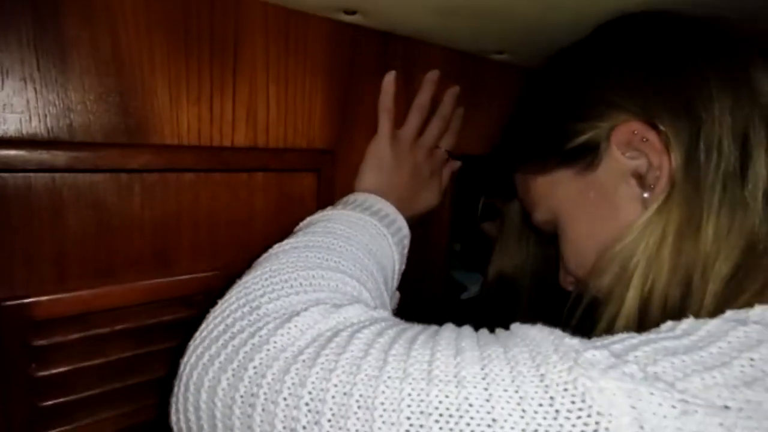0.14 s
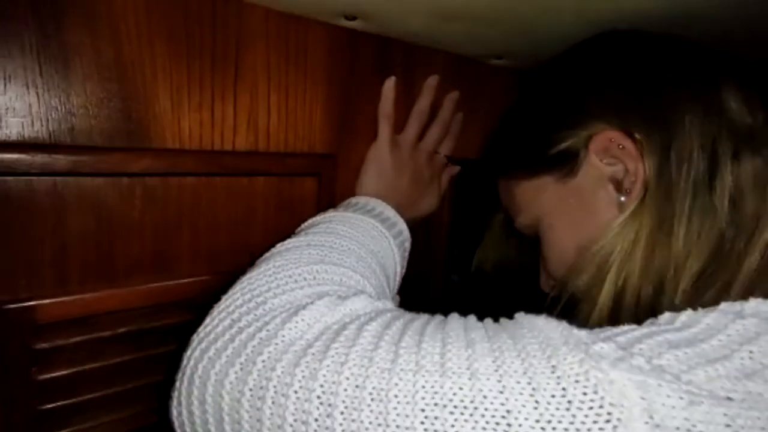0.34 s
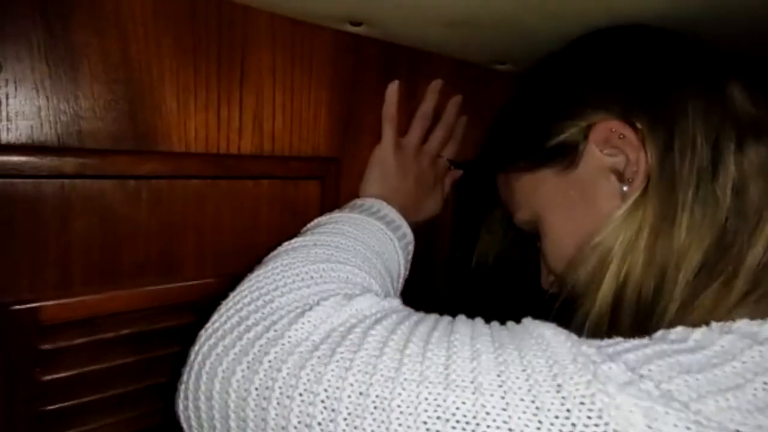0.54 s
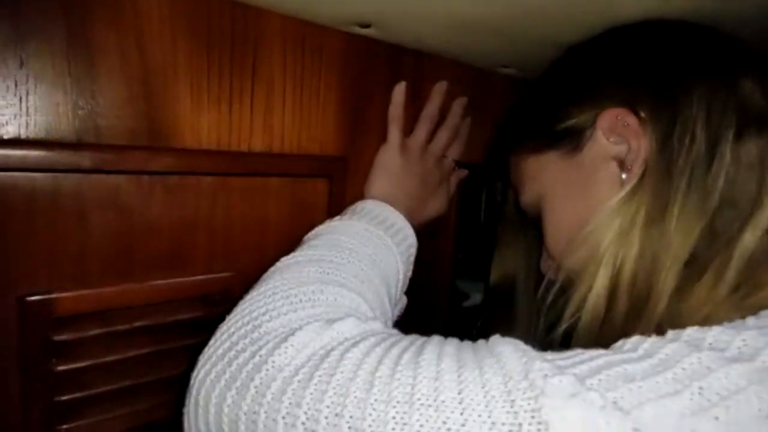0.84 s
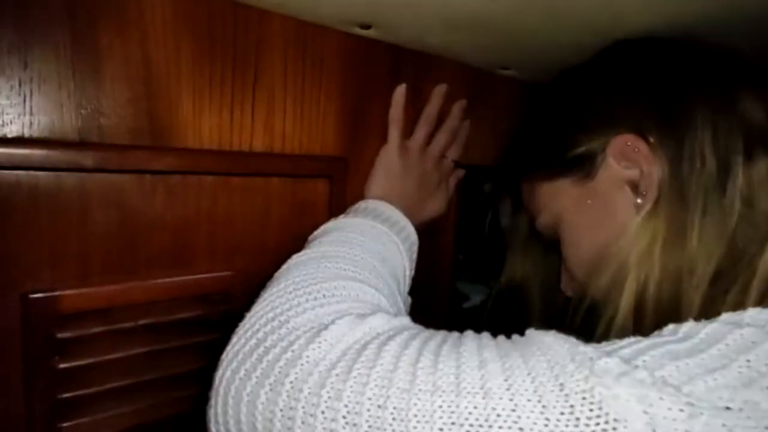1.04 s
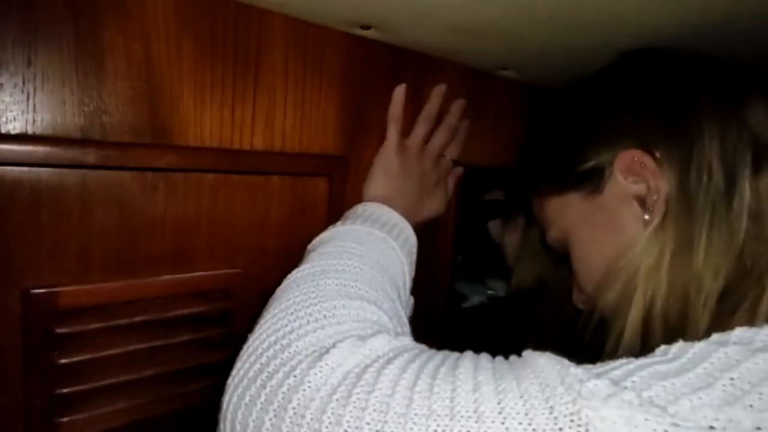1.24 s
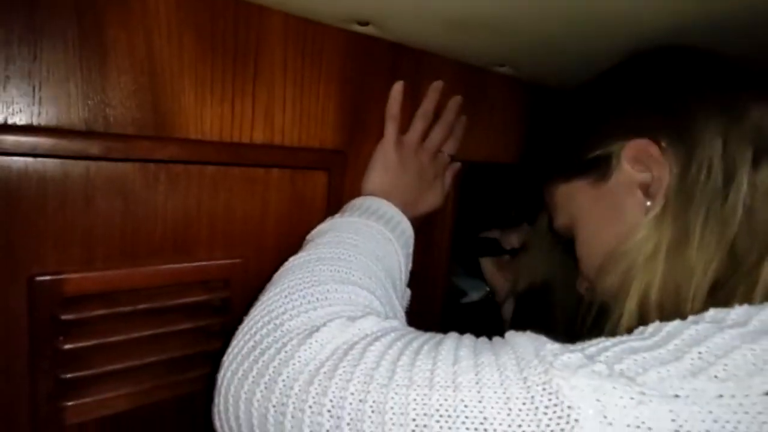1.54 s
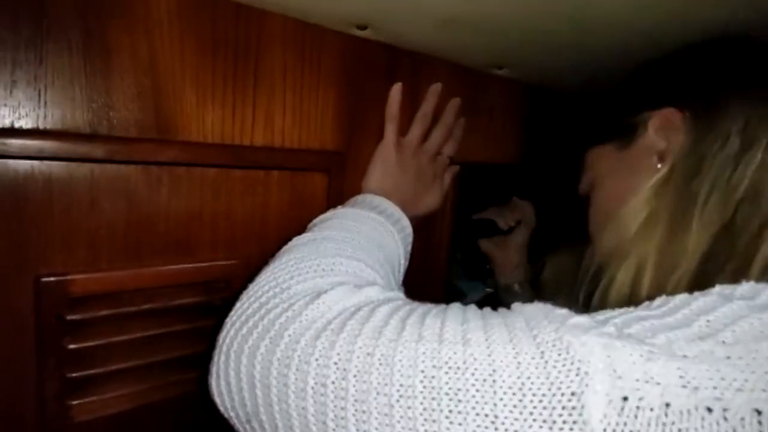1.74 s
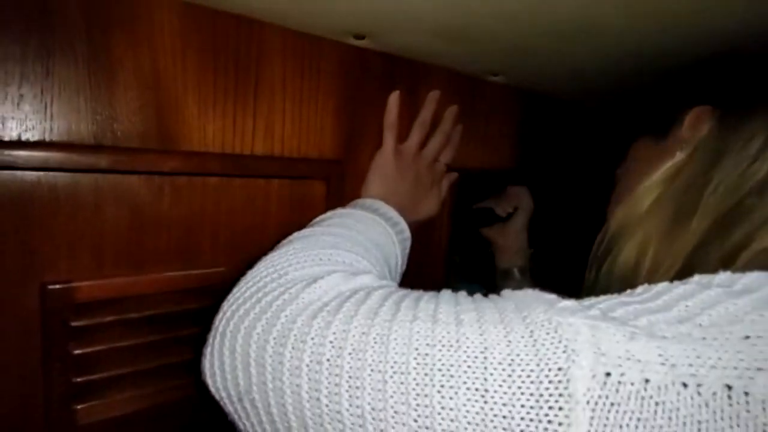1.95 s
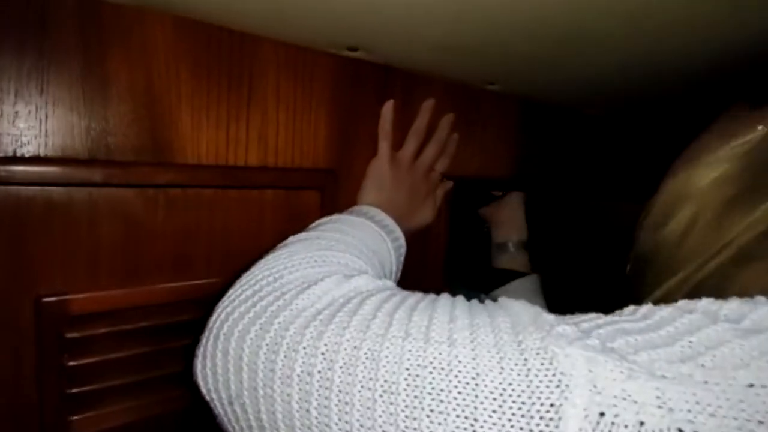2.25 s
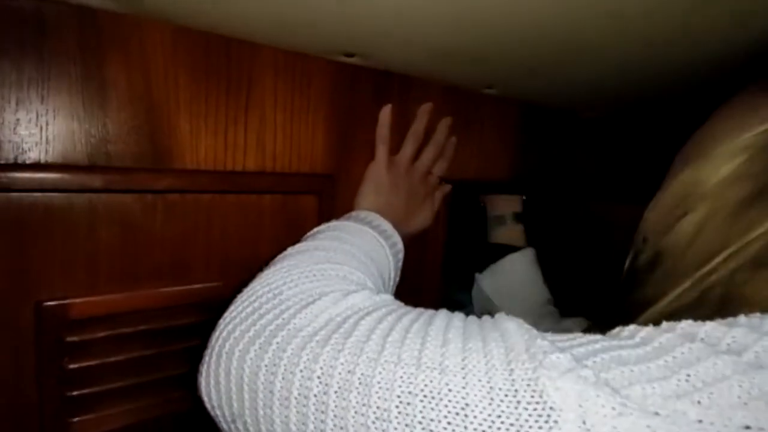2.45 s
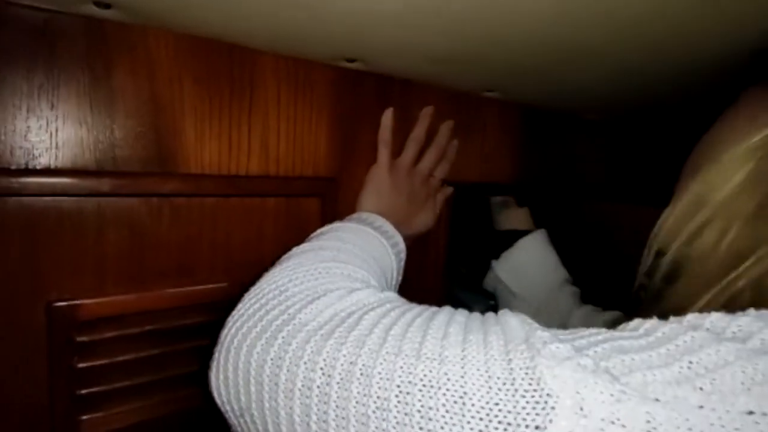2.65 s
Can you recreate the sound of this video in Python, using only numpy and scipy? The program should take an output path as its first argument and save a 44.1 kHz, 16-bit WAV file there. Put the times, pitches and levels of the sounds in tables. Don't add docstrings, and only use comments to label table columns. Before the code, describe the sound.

A hand toilet pump worked close by in a small wooden boat cabin. Rattling clack and low thumps at the start, a sharp clack at 0.4 s, a harder clack with splash at 0.85, lighter knocks from 1.0 to 1.45. Watery gurgle and hiss around 1.7, clacks at 2.15 and 2.3, then a loud hollow double glug at 2.5, the heaviest clack and boom at 2.6, and trailing bubbles.

```python
import sys
import numpy as np
from scipy import signal
from scipy.fft import rfft, irfft
from scipy.io import wavfile
from scipy.ndimage import uniform_filter1d

SR = 44100
rng = np.random.default_rng(int(sys.argv[2]) if len(sys.argv) > 2 else 0)


def to_wav(sig):
    pcm = np.clip(np.atleast_2d(sig), -1, 1) * 32767
    pcm = np.round(pcm).astype(np.int16)
    wavfile.write(sys.argv[1], SR, pcm.T)


def gain_from_db(level_db):
    decades = np.asarray(level_db, float) / 20
    return 10 ** decades


N = 123479

# (frequency [Hz], correlation [0-1])
PORT_LIKENESS = [(120, 0.98), (300, 0.59), (700, 0.69), (1500, 0.067)]


def evened(x):
    return x / np.sqrt(np.mean(x ** 2) + 1e-20)


def read(points, hz):
    f, value = np.transpose(points)
    return np.interp(np.log(hz + 1), np.log(f + 1), value)


def add(mix, start_s, sound):
    part = mix[:, round(start_s * SR):][:, :sound.shape[-1]]
    part += sound[..., :part.shape[1]]


def wavering(hz, depth, smooth, count):
    waver = depth * evened(uniform_filter1d(rng.standard_normal(count), size=smooth))
    return np.cumsum(hz * (1 + waver)) / SR


def port_pair(first, second, hz):
    same = np.clip(read(PORT_LIKENESS, hz), 0, 1).reshape(-1, *[1] * (first.ndim - 1))
    return np.array([first, same * first + np.sqrt(1 - same ** 2) * second])


def resonate(x, hz, width_hz):
    r = np.exp(-np.pi * width_hz / SR)
    return signal.lfilter([1 - r, 0, r - 1], [1, -2 * r * np.cos(2 * np.pi * hz / SR), r * r], x)


def burst(db, length_s, low_db, top_db, rise_s, t60_s, grit_db, ring_db, trim_db):
    # (frequency [Hz], density [dB per Hz])
    housing = [(180, -14.5), (300, -1), (1140, -9), (2170, -3.5), (4830, -13), (5250, -11.5), (6410, -19.5),
               (13800, -33.5), (16000, -37)]
    # (frequency [Hz], width [Hz], level [dB])
    bowl_modes = [(689, 75, -8), (942.6, 24, 4.5), (1168, 24, -8), (1318, 22, -0.5), (1750, 81, -4),
                  (2172, 54, -5.5), (2635, 77, -10.5), (3533, 86, -6)]
    size, grain = 8192, 64
    t, hz = np.arange(size) / SR, np.fft.rfftfreq(size, 1 / SR)
    grit = gain_from_db(grit_db * np.clip(rng.exponential(1, size // grain), 0, 2.5)).repeat(grain)
    first, second = rfft(rng.standard_normal((2, size)) * grit)
    tilt = [(600, low_db), (2000, 0.0029), (9000, top_db)]
    clicks = evened(irfft(port_pair(first, second, hz) * gain_from_db(read(housing, hz) + read(tilt, hz))))

    after_s = np.maximum(t - length_s, 0)
    held = np.minimum(t / rise_s, 1) * gain_from_db(-3 * np.minimum(t / length_s, 1))
    decay = gain_from_db(-60 * after_s / t60_s) + gain_from_db(-10 - 60 * after_s / 0.076)
    strike = clicks * held * decay

    ring = np.zeros_like(strike)
    for mode_hz, width_hz, mode_db in bowl_modes:
        gain = gain_from_db(mode_db + rng.uniform(-4.5, 3.7))
        ring += gain * resonate(strike, mode_hz * rng.uniform(0.96, 1.02), width_hz)
    return gain_from_db(db + trim_db) * (strike + gain_from_db(ring_db) * ring)


def lever_clacks(mix):
    # (time [s], peak [dB], rattle length [s], low tilt [dB], top tilt [dB])
    clack_events = [(0.055, -28, 0.031, -9, -5), (0.072, -20.5, .03, -2, 2.5), (0.429, -18, 0.012, -1, 5.5),
                    (0.595, -34.5, 0.0037, -4, -37), (0.838, -13, 0.012, 12, 11.5),
                    (0.874, -20.5, 0.022, 8, 9), (0.983, -25, 0.016, 0, 0), (1.008, -20.5, 0.012, 4.5, 1.5),
                    (1.142, -27.5, 0.01, 3, -2), (1.208, -18.5, 0.0087, -1.5, 3.5),
                    (1.248, -26.5, 0.0081, 6, -5), (1.437, -19, 0.01, -3.5, 7),
                    (2.143, -20.5, 0.0089, 1.5, 0), (2.331, -21, 0.017, -6, 12),
                    (2.586, -9.5, 0.015, 11.5, 9), (2.685, -23.5, 0.034, 3.5, 6)]
    for start_s, *row in clack_events:
        add(mix, start_s, burst(*row, rise_s=0.0015, t60_s=0.088, grit_db=2.5, ring_db=2.5, trim_db=-8.5))


def splashes(mix):
    # (time [s], peak [dB], length [s], low tilt [dB], top tilt [dB])
    splash_events = [(.001, -20, 0.0067, -4, 1.5), (0.686, -32.5, 0.038, 10, -13),
                     (0.823, -24, 0.033, 5, 11), (1.726, -22.5, 0.03, -9, -19.5),
                     (1.76, -20.5, 0.012, 8, -15), (1.998, -34.5, 0.027, -11, -5),
                     (2.321, -23.5, 0.013, -4, 0), (2.448, -26.5, 0.017, 9.5, 10),
                     (2.474, -21, 0.066, 10, 2.5), (2.52, -29, 0.03, 12.5, 2),
                     (2.619, -20.5, 0.033, -0.5, 8.5), (2.736, -20, 0.017, 10.5, -17)]
    for start_s, *row in splash_events:
        add(mix, start_s, burst(*row, rise_s=0.0028, t60_s=0.045, grit_db=1.0, ring_db=13, trim_db=-12.0))


def glug(db, hz, swell_s, fade_s):
    t = np.arange(SR // 7) / SR
    sag_octaves = 0.24 * (hz < 210) * (np.minimum(t / 0.05, 1) - 0.3)
    turns = wavering(hz * 2 ** -sag_octaves, 0.055, 150, len(t))
    tone = np.sin(2 * np.pi * turns)
    tone += 0.057 * np.sin(4 * np.pi * turns + 1) + 0.031 * np.sin(6 * np.pi * turns)
    swell = np.sin(np.pi / 2 * np.minimum(t / swell_s, 1)) ** 2
    fade_s = min(abs(fade_s), 0.045)
    fade_db = -20 * (np.maximum(t - swell_s, 0) / fade_s) ** 1.5
    return tone * swell * gain_from_db(db + fade_db)


def glugs(mix):
    # (time [s], peak [dB], pitch [Hz], swell [s], fade to -20 dB [s]: sign ignored, 0.045 at most)
    glug_events = [(.035, -21.5, 386.6, 0.01, 0.4), (0.435, -28.5, 228, 0.003, 5),
                   (0.507, -32.5, 247.5, 0.0094, -1.5), (0.561, -28.5, 238, 0.0087, 0.1),
                   (0.634, -37, 459, 0.01, .02), (0.85, -24.5, 623, 0.0084, .02),
                   (0.852, -27.5, 343, 0.008, 0.5), (1.379, -30.5, 176, 0.0078, .03),
                   (1.44, -28, 163, 0.0078, .02), (1.551, -25.5, 195, 0.003, .045),
                   (1.635, -35, 680, 0.008, -11), (1.701, -20.5, 384, 0.0073, 0.26),
                   (1.76, -30.5, 532, 0.025, 4.2), (2.318, -19, 346.6, 0.0052, -3),
                   (2.322, -23.5, 956, 0.018, 0.4), (.868, -24.5, 265, 0.013, -7),
                   (2.384, -23, 436, 0.0066, .045), (2.47, -7, 350.4, 0.032, 0.23),
                   (2.524, -7.5, 280, 0.0086, -0.15), (2.538, -14.5, 274, 0.0024, 2),
                   (2.573, -18, 269.5, 0.0076, 4.5), (2.632, -22.5, 471, 0.0038, .03),
                   (2.722, -23, 197.6, 0.0093, 1)]
    for start_s, *row in glug_events:
        add(mix, start_s, glug(*row))


def boom(db, jolt_db, hz, swell_s):
    t = np.arange(0, 0.35, 1 / SR)
    after_s = np.maximum(t - swell_s, 0)
    shape = np.minimum(t / swell_s, 1) * gain_from_db(-60 * 1.73 * after_s ** 1.272 / 0.35 ** 1.24)
    panel = shape * np.sin(2 * np.pi * hz * t + rng.uniform(0, 2 * np.pi))
    jolt = gain_from_db(jolt_db) * np.sin(2 * np.pi * rng.uniform(58, 80) * t) * gain_from_db(-60 * t / 0.053)
    return gain_from_db(db) * (panel + jolt)


def cabin_booms(mix):
    # (time [s], peak [dB], slow jolt over boom [dB])
    boom_events = [(0.001, -27, -2), (0.04, -26.5, 6), (0.116, -28, 3), (0.187, -26, -5),
                   (0.27, -25.5, -10), (0.443, -24, -21), (0.576, -23.5, -4), (0.658, -28, -10),
                   (0.751, -27, -20), (0.842, -30, -10), (0.961, -32, 7), (1.002, -23, 3),
                   (1.213, -25.5, -9), (1.404, -27.5, 3), (1.459, -29, 9), (1.563, -25, 2), (1.683, -29, 7),
                   (1.749, -27, 6), (2.153, -26.5, -13), (2.313, -33, 6), (2.464, -24.5, -5),
                   (2.573, -13.5, -2), (2.72, -23, 4)]
    for start_s, *row in boom_events:
        add(mix, start_s, boom(*row, hz=109.9 * rng.uniform(0.916, 1.03), swell_s=0.0093))


def chirp(db, hz, length_s):
    t = np.arange(SR // 16) / SR
    turns = wavering(hz, 0.013, 120, len(t))
    arch = np.sin(np.pi * np.minimum(t / (1.2 * length_s), 1) ** 0.82) ** 2
    return gain_from_db(db) * arch * np.sin(2 * np.pi * turns)


def bubble_chirps(mix):
    # (time [s], peak [dB], pitch [Hz], length [s])
    chirp_events = [(0.254, -35, 268, 0.045), (0.43, -27.5, 4060, 0.0056), (0.436, -23.5, 5160, 0.0049),
                    (.44, -26.5, 3610, 0.0056), (0.441, -28, 2390, 0.0065), (0.595, -36, 1220, 0.0065),
                    (0.634, -32.5, 216.4, 0.028), (0.833, -21, 1640, 0.013), (.838, -27.5, 2300, 0.023),
                    (.836, -23, 537, .024), (0.871, -28.5, 628, 0.045), (.882, -33, 464, 0.029),
                    (0.883, -28, 1440, 0.015), (0.901, -28, 342, 0.025), (1.234, -36.5, 245, 0.038),
                    (1.726, -38, 913, 0.033), (1.735, -29.5, 648, 0.025), (1.731, -33.5, 2232, 0.019),
                    (1.762, -32, 900, 0.017), (1.765, -26.5, 2210, 0.021), (2.317, -23, 1275, 0.014),
                    (2.322, -27, 1120, .035), (2.336, -28.5, 1820, 0.025), (2.338, -29, 2066, 0.018),
                    (2.345, -26, 2390, 0.021), (2.35, -28.5, 1297, 0.025), (2.478, -30.5, 531, 0.055),
                    (2.483, -29, 967, 0.016), (2.491, -30, 677, 0.07), (2.493, -22, 1264, 0.027),
                    (2.506, -25, 856, 0.026), (2.517, -25.5, 1105, .025), (2.526, -32, 1825, 0.035),
                    (2.522, -31.5, 2470, 0.024), (2.586, -23.5, 545, 0.0166), (2.587, -22.5, 1668, 0.019),
                    (2.641, -22.5, 258, 0.033), (2.657, -30, 428, 0.049), (2.682, -31, 2490, 0.046),
                    (2.731, -28.5, 961, 0.022), (2.739, -33.5, 588, 0.041), (2.743, -29.5, 1856, 0.018),
                    (1.72, -28.5, 411, 0.036), (2.505, -33.5, 3260, 0.031)]
    for start_s, *row in chirp_events:
        add(mix, start_s, chirp(*row))


def patchy(colour, level_db, bright_db, patchy_db, flicker_db):
    size, hop = 1024, 256
    frames, hz = N // hop + 5, np.fft.rfftfreq(size, 1 / SR)
    a, b, c, d, patches = rng.standard_normal((frames, len(hz), 5)).T
    noise = port_pair(a + 1j * b, c + 1j * d, hz)
    patches = evened(uniform_filter1d(uniform_filter1d(patches, 6, 0), 8, 1))
    field_db = read(colour, hz)[:, None] + patchy_db * patches + flicker_db * rng.standard_normal(frames)
    bright_share = read([(4000, 0.11), (8500, 0.65), (12500, 0.6), (15500, 0.6)], hz)
    field_db = field_db + np.outer(bright_share, bright_db(np.arange(frames) * hop / SR))
    x = signal.istft(noise * gain_from_db(field_db), nperseg=size, noverlap=size - hop)[1][:, :N]
    return evened(x) * gain_from_db(level_db(np.arange(N) / SR))


def valve_hiss():
    # (time [s], hiss [dB], brightness [dB])
    flow = [(0, -41, -1), (.2, -51, -3.5), (.55, -51.5, -0.5), (.8, -47.5, 8), (0.959, -49, 6),
            (1.1, -52.5, -2), (1.38, -51, -3), (1.62, -45, 3), (1.85, -43, 8), (2.029, -49, 6.5),
            (2.28, -50, -6), (2.44, -47.5, -8), (2.55, -38, 4), (2.8, -47.5, 7)]
    # (frequency [Hz], density [dB per Hz])
    hiss_colour = [(290, -4.5), (631, -1), (870, -8), (2360, -2.5), (2980, -12.5), (6000, -19.5),
                   (7500, -31.5), (15500, -31)]
    s, db, bright = np.transpose(flow)
    return patchy(hiss_colour, lambda t: np.interp(t, s, db) + 4.0,
                  lambda t: np.interp(t, s, bright) + 5, patchy_db=0.0, flicker_db=2.5)


def hose_gurgle():
    # (time [s], level [dB])
    slosh = [(0, -33), (.3, -38.5), (.7, -40), (1.05, -39.5), (1.13, -50.5), (1.36, -44), (1.42, -39),
             (1.75, -35), (1.9, -41.5), (2.2, -42), (2.29, -53), (2.45, -33.5), (2.48, -26), (2.66, -30),
             (2.8, -33.5)]
    # (frequency [Hz], density [dB per Hz])
    gurgle_colour = [(8.8, -35), (15, -14), (103, 5.5), (172, -7.5), (267, -2), (321, -6), (1200, -22),
                     (1560, -60)]
    s, db = np.transpose(slosh)
    return patchy(gurgle_colour, lambda t: np.interp(t, s, db), np.zeros_like, patchy_db=2.1, flicker_db=1.1)


def cabin(x):
    # (frequency [Hz], t60 [s])
    cabin_t60 = [(300, 0.41), (8000, 0.011)]
    # (frequency [Hz], echo over direct [dB])
    echo_level = [(100, -27.5), (400, -7)]
    taps = np.zeros((2, SR // 2))
    at = np.arange(80, SR // 2 - 20, 20) + rng.integers(0, 20, (2, (SR // 2 - 81) // 20))
    np.put_along_axis(taps, at, rng.choice([-1., 1.], at.shape), 1)
    hz, t, z = signal.stft(taps, SR, nperseg=256)
    t60_s = read(cabin_t60, hz)[:, None]
    gain = gain_from_db(-60 * t / t60_s + read(echo_level, hz)[:, None]) / np.sqrt(150 * t60_s)
    tail = signal.istft(z * gain, SR, nperseg=256)[1]
    return signal.fftconvolve(x, tail, axes=1)[:, :N]


def ports(x):
    # (frequency [Hz], left minus right [dB])
    left_lean = [(60, 1), (180, -1.5), (550, -0.5), (1650, 8), (4970, 2.5), (15000, -4.5)]
    lag_s, lag_from_hz = 23 / 44100, 1300
    hz = np.fft.rfftfreq(N, 1 / SR)
    lag = np.exp(-2j * np.pi * hz * lag_s / (1 + (lag_from_hz / (hz + 1)) ** 6))
    lean = gain_from_db(read(left_lean, hz) / 2)
    return irfft(rfft(x) * np.array([lag * lean, 1 / lean]), N)


def scene():
    mix = valve_hiss() + hose_gurgle()
    lever_clacks(mix)
    splashes(mix)
    glugs(mix)
    cabin_booms(mix)
    bubble_chirps(mix)
    return ports(mix + cabin(mix))


def roll_off(x):
    return signal.sosfilt(signal.butter(12, 16560, fs=SR, output="sos"), x)


def record(dry):
    edge = signal.firwin(767, 15800, fs=SR)
    mix = signal.oaconvolve(dry, edge[None], "same")
    return roll_off(mix)


dry = scene()
out = record(dry)
to_wav(out)
```